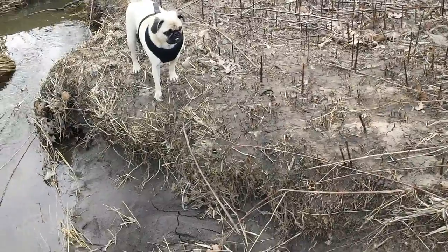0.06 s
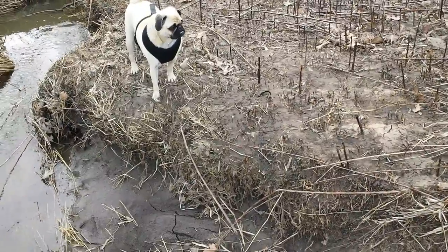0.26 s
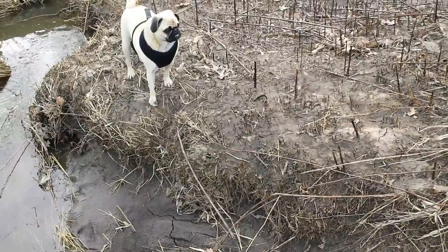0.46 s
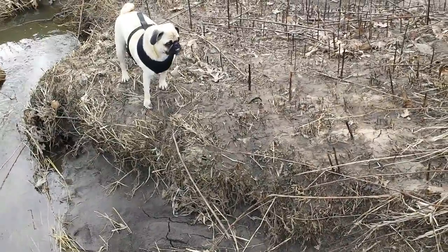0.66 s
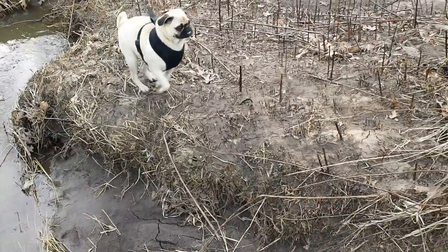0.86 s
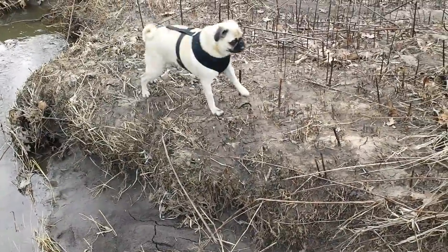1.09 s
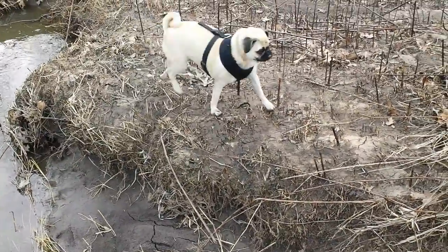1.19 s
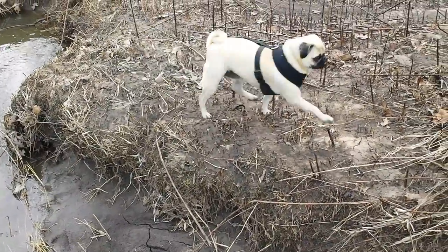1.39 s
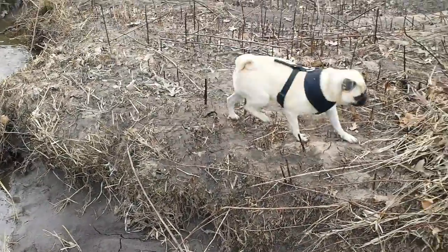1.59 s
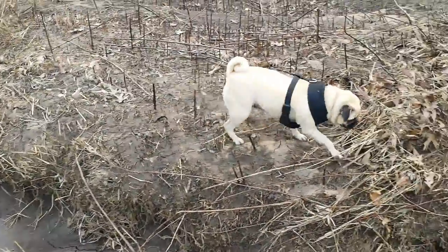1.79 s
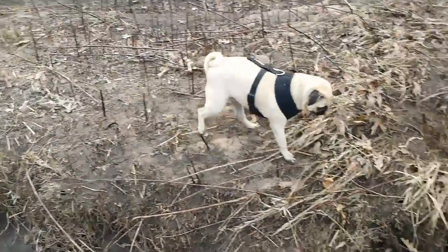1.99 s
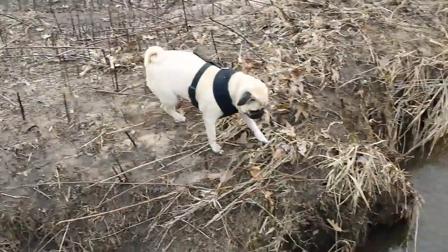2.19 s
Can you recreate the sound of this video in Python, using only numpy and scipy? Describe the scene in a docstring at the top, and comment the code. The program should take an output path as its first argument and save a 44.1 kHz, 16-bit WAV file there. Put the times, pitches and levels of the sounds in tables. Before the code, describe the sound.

A small dog's paws crunch and rustle through dry grass after wind buffets the microphone

```python
"""Creek bank of dry grass and reed stalks: a small dog trots by a hand-held two-port microphone.
Paws crush the grass (clumped cracks over hiss) and stalks snap (short noise bursts).
Wind rumbles gently on the left port and buffets the right one hard with bursting eddies (coloured noise).
The hand taps, knocks and ticks the casing (decaying modes); something wheezes once (narrow-band noise).
Far birds whistle and rasp (sines on pitch tracks) over the soft hiss of creek, reeds and open air."""
import sys
import numpy as np
from scipy import signal
from scipy.fft import rfft, irfft, next_fast_len
from scipy.io import wavfile
from scipy.ndimage import uniform_filter1d, map_coordinates

SR = 44100
rng = np.random.default_rng(int(sys.argv[2]) if len(sys.argv) > 2 else 0)


def dump_mix(stems):
    """Bounce the given channels to the path in sys.argv[1] as a 16-bit WAV at rate SR."""
    frames = np.atleast_2d(stems).T  # one column per channel
    limited = np.clip(frames, -1, 1)  # hard clip at full scale
    pcm = np.round(limited * 32767).astype(np.int16)
    wavfile.write(sys.argv[1], SR, pcm)


def natural_amplitude(level_db):
    """Convert a level in decibels to a linear amplitude factor, elementwise."""
    exponent = np.asarray(level_db, float) / 20
    return 10 ** exponent


N = 99225
T = np.arange(N) / SR


def unit(x):
    """Scales x to rms 1 over all its channels."""
    return x / np.sqrt(np.mean(x ** 2) + 1e-20)


def curve(rows):
    """Reads a (t/s, value) table at every sample."""
    return np.interp(T, *np.transpose(rows))


def wobble(knots_per_s):
    """Smooth random curve through normal knots."""
    knots = rng.standard_normal(int(N * knots_per_s / SR) + 4)
    return map_coordinates(knots, [T * knots_per_s])


def filtered(x, response):
    """Multiplies the spectrum of x by a response of frequency."""
    m = next_fast_len(N + 8192)
    return irfft(rfft(x, m) * response(np.fft.rfftfreq(m, 1 / SR)), m)[..., :N]


def colour(points):
    """Gain through (f/Hz, level/dB) points on a log frequency axis."""
    f, db = np.transpose(points)
    return lambda hz: natural_amplitude(np.interp(np.log(hz + 1), np.log(f), db))


def noise(points, channels=2):
    """Independent coloured noises, joint rms 1."""
    return unit(filtered(rng.standard_normal((channels, N)), colour(points)))


def add(track, s, x):
    """Mixes x into the track from time s."""
    part = track[..., round(s * SR):][..., :x.shape[-1]]
    part += x[..., :part.shape[-1]]


PATCH_DB = 2.6  # rms


def patchy(x):
    """Random gains over small patches of time and frequency make the sound blotchy."""
    z = signal.stft(x, nperseg=128)[2]
    field = rng.standard_normal(z.shape[1:])
    field = uniform_filter1d(field, size=5, axis=0)  # frequency
    field = uniform_filter1d(field, size=4, axis=1)  # time
    patches = z * natural_amplitude(PATCH_DB * unit(field))
    return unit(signal.istft(patches, nperseg=128)[1][:, :N])


# paws in the grass: t/s, level/dB
TREAD = [(1.862, -53), (1.875, -45.5), (1.935, -40), (1.985, -42.5), (2.03, -45), (2.095, -54.5),
         (2.12, -49), (2.19, -48), (2.25, -49.5)]
# stalks brushed lightly: middle t/s, half length/s, level/dB
BRUSHES = [(1.159, 0.033, -56), (1.286, 0.069, -52.5), (1.44, 0.016, -67), (1.75, 0.11, -59)]
# colour of crushed grass: f/Hz, level/dB
GRASS = [(200, -18.5), (700, -11), (2070, -4.5), (3600, -12), (5000, 1.5), (7500, -3), (13600, -12.5),
         (15500, -47)]
# snapping stalks: t/s, relative level/dB
SNAPS = [(0.819, -37), (1.2914, -30.5), (1.3183, -41), (1.618, -35.5), (1.721, -39.5), (1.732, -41),
         (1.7725, -38.5), (1.8844, -30), (1.8892, -25.5), (1.8932, -25.5), (1.9171, -29), (1.931, -25),
         (1.969, -30), (1.987, -29), (2.011, -36), (2.135, -42), (2.154, -41), (2.2204, -37)]
# colour of a snapping stalk: f/Hz, level/dB
STALK = [(1200, -18.5), (3500, -13.5), (5200, 1.5), (8500, -3), (13500, -18), (15500, -37)]
GRAINS_PER_S, GRAIN_SPREAD_DB, HISS_DB, LEFT_LAG_S = 3000, 3, 1, .00039
SNAP_DB, SNAP_RISE_S, SNAP_T60_S = -7, .0012, .015


def grass():
    """Crushed blades: dense tiny cracks in clumps over a hiss; stalks give way in short bursts."""
    sizes_db = GRAIN_SPREAD_DB * np.minimum(rng.exponential(size=N), 2)
    cracks = (rng.random(N) < GRAINS_PER_S / SR) * rng.standard_normal(N) * natural_amplitude(sizes_db)
    bed = unit(filtered(cracks, colour(GRASS))) + natural_amplitude(HISS_DB) * noise(GRASS)
    tread_db = np.interp(T, *np.transpose(TREAD), left=-120) + 1.14 * wobble(150)
    brush = np.zeros(N)
    for s, half_s, db in BRUSHES:
        brush += natural_amplitude(db) * np.cos(np.pi / 2 * np.clip((T - s) / half_s, -1, 1)) ** 2
    out = patchy(bed) * (natural_amplitude(tread_db) + brush)

    t = T[:SR // 10]
    shape = natural_amplitude(-60 * t / SNAP_T60_S) * (1 - np.exp(-t / SNAP_RISE_S))
    shape_rms = np.sqrt(np.mean(shape ** 2)) / shape.max()
    fibres = 0.7 * noise(STALK, channels=1) + 1.2 * noise(STALK)  # shared + per port
    for s, db in SNAPS:
        burst = shape * fibres[:, round(s * SR) - len(t):round(s * SR)]
        add(out, s, natural_amplitude(db + SNAP_DB) * unit(burst) * shape_rms)
    lag_s = np.array([[LEFT_LAG_S], [0]])
    return filtered(out, lambda hz: np.exp(-2j * np.pi * hz * lag_s))


# left port wind: t/s, level/dB
BREEZE = [(0, -49.5), (.8, -52), (1.25, -52), (1.6, -58.5)]
# right port wind under the eddies: t/s, level/dB
LULL = [(0, -54.5), (.6, -47.5), (1.3, -52.5), (1.5, -57), (1.9, -52.5)]
# colour of the rumble: f/Hz, level/dB
RUMBLE = [(12, -46), (25, -29), (50, 0), (110, 1), (170, -10), (300, -35), (600, -71), (1200, -120)]
# colour of the flutter: f/Hz, level/dB
FLUTTER = [(60, -43), (130, -6.5), (220, 1), (330, -10), (520, -23.5), (800, -35), (1600, -120)]
# eddies bursting on the right port: middle t/s, half length/s, level/dB, flutter re rumble/dB
EDDIES = [(0.241, 0.043, -36, -16.5), (0.304, 0.033, -31.5, -14.5), (.34, 0.031, -34.5, -6.5),
          (0.471, 0.022, -32.5, -13), (0.502, 0.011, -32, -28), (0.542, 0.029, -32.5, -25),
          (0.598, 0.045, -31.5, -22), (0.635, 0.015, -34, -13), (0.699, 0.046, -30, -14.5),
          (0.749, 0.024, -28, -5.5), (0.771, 0.019, -29, 3), (0.802, 0.027, -29, -8),
          (0.844, 0.029, -23.5, -7), (0.894, 0.032, -33, -16), (1.044, 0.043, -42, -13.5),
          (1.142, 0.031, -41, -19), (1.231, 0.027, -43, -25)]
CALM_FLUTTER_DB = -13  # re rumble


def wind():
    """Lumpy rumble on both ports; eddies burst on the right one, each a rumble with faster flutter."""
    left_db = curve(BREEZE) + 3 * wobble(7.23)
    right_db = curve(LULL) + 3 * wobble(20.95)
    out = natural_amplitude([left_db, right_db]) * (noise(RUMBLE) + natural_amplitude(CALM_FLUTTER_DB) * noise(FLUTTER))
    rumble, flutter = noise(RUMBLE, channels=1)[0], noise(FLUTTER, channels=1)[0]
    for s, half_s, db, flutter_db in EDDIES:
        near = slice(round((s - half_s) * SR), round((s + half_s) * SR))
        bell = np.cos(np.pi / 2 * (T[near] - s) / half_s) ** 2
        eddy = unit(bell * rumble[near]) + natural_amplitude(flutter_db) * unit(bell ** 2 * flutter[near])
        out[1, near] += natural_amplitude(db) * eddy
    return out


# soft finger taps: t/s, relative level/dB, port (0 left, 1 right)
TAPS = [(.033, -33, 0), (1.547, -33.5, 0), (2.039, -32.5, 1)]
# casing modes: f/Hz, relative level/dB, t60/s
CASING = [(368, -3.5, 0.032), (670, 4.5, 0.013), (1500, -9, 0.016)]
FAR_PORT_DB = -18
KNOCK_S, KNOCK_PUSH_S, KNOCK_DB, RATTLE_DB, RATTLE_T60_S = 1.8282, .00035, -21, -8, .035
TICK_S, TICK_DB, TICK_HZ, TICK_T60_S = 1.8674, -12.5, 5340, 0.001


def hand():
    """Soft taps ring the casing modes; the right port gets one knock with a rattle, then a sharp tick."""
    out, t = np.zeros((2, N)), T[:SR // 10]
    ring = sum(natural_amplitude(db - 60 * t / t60_s) * np.sin(2 * np.pi * hz * t) for hz, db, t60_s in CASING)
    for s, db, port in TAPS:
        far = np.arange(2)[:, None] != round(port)
        add(out, s, natural_amplitude(db - 9.0) * ring * natural_amplitude(FAR_PORT_DB * far))

    u = t / KNOCK_PUSH_S
    push = -np.e * u * np.exp(-u) + .2 * (u / 5) * np.exp(1 - u / 5)  # push, slower rebound
    rattle_noise = noise([(300, -16), (1500, 2.5), (6500, -2), (15000, -23.5)], channels=1)[0, :len(t)]
    rattle = natural_amplitude(RATTLE_DB - 60 * t / RATTLE_T60_S) * (1 - np.exp(-t / 0.00037)) * rattle_noise
    add(out[1], KNOCK_S, natural_amplitude(KNOCK_DB) * (push + rattle))

    tick = natural_amplitude(-60 * t / TICK_T60_S) * np.sin(2 * np.pi * TICK_HZ * t)
    add(out[1], TICK_S, natural_amplitude(TICK_DB) * tick)
    return out


# wheezy hiss: t/s, level/dB
SWISH = [(.67, -64), (.71, -52.5), (.8, -47), (.85, -50), (.9, -67)]
# its resonances: f/Hz, width/Hz, level/dB
SWISH_BANDS = [(4280, 890, -4), (6110, 420, 3.5), (5300, 10000, -10)]


def swish():
    """One wheezy swell: noise through two narrow resonances and a broad one."""
    def bands(f):
        power = sum(natural_amplitude(2 * db) / (1 + (2 * (f - hz) / width_hz) ** 2) ** 2
                    for hz, width_hz, db in SWISH_BANDS)
        return np.sqrt(power)
    level_db = np.interp(T, *np.transpose(SWISH), left=-120, right=-120)
    return natural_amplitude(level_db) * unit(filtered(rng.standard_normal((2, N)), bands))


FADE_S = .008


def whistle(pitch_hz, db):
    """Complex sine along a pitch track, with linear fades at both ends."""
    t = T[:len(pitch_hz)]
    fade = np.minimum(1, np.minimum(t, t[::-1]) / FADE_S)
    return natural_amplitude(db + 4.5) * fade * np.exp(2j * np.pi * np.cumsum(pitch_hz) / SR)


# whistles: t/s, length/s, first f/Hz, last f/Hz, relative level/dB
NOTES = [(.001, .08, 4500, 4330, -69), (.08, 0.069, 4310, 4180, -64.5), (.001, 0.13, 2750, 2917, -70.5),
         (0.136, 0.14, 4220, 4520, -65.5), (.782, 0.056, 5590, 5350, -59.5),
         (0.896, 0.09, 5400, 5490, -59.5), (0.916, .03, 5300, 5220, -56), (0.988, 0.041, 5530, 5480, -64),
         (0.979, 0.068, 4040, 4170, -68), (1.212, 0.031, 4150, 4090, -67), (1.243, 0.033, 4160, 4120, -54),
         (1.304, 0.065, 4050, 4050, -56.5), (1.335, .06, 5480, 5440, -66), (1.577, 0.03, 4750, 3040, -68),
         (1.637, 0.041, 4640, 4630, -64.5)]
# hoarse, fluttering calls: t/s, length/s, first f/Hz, last f/Hz, relative level/dB
RASPS = [(0.203, 0.017, 1750, 1980, -57.5), (0.834, 0.071, 4150, 4040, -61.5),
         (0.924, .075, 2700, 2450, -61), (1.065, 0.074, 4560, 4770, -58.5), (1.145, 0.03, 2690, 2510, -63),
         (1.142, 0.045, 5600, 5920, -58), (1.187, 0.028, 5600, 3030, -58.5),
         (1.262, 0.024, 3500, 3300, -60), (1.43, .022, 5100, 3310, -61.5), (1.528, 0.035, 4250, 4900, -63)]
# chirps that bend over: t/s, length/s, top f/Hz, relative level/dB
ARCHES = [(0.083, 0.052, 7350, -62.5), (0.165, 0.041, 7030, -62.5)]
ARCH_TOP, ARCH_DEPTH = .7, .25  # position in the chirp 0..1, curvature
RASP_RAD, RASP_KNOTS_PER_S, RASP_DB = 1.1, 320, 2.5  # level flutters at half this knot rate
WAVER_DB, WAVER_KNOTS_PER_S = 2, 45.07
WARBLE_RAD, WARBLE_KNOTS_PER_S = .9, 170
TREES_T60_S, TREES_DB = .12, -9


def birds():
    """Far whistles waver in level and phase on their way to each port and linger among the trees."""
    song = np.zeros(N, complex)
    for s, length_s, first_hz, last_hz, db in NOTES:
        add(song, s, whistle(np.linspace(first_hz, last_hz, round(length_s * SR)), db))
    rasp_gain = natural_amplitude(RASP_DB * wobble(RASP_KNOTS_PER_S / 2))
    rasp = rasp_gain * np.exp(1j * RASP_RAD * wobble(RASP_KNOTS_PER_S))
    for s, length_s, first_hz, last_hz, db in RASPS:
        call = whistle(np.linspace(first_hz, last_hz, round(length_s * SR)), db)
        add(song, s, call * rasp[round(s * SR):][:len(call)])
    for s, length_s, top_hz, db in ARCHES:
        u = np.linspace(0, 1, round(length_s * SR))
        add(song, s, whistle(top_hz * (1 - ARCH_DEPTH * (u - ARCH_TOP) ** 2), db))

    heard = np.zeros((2, N))
    for port in range(2):
        waver = natural_amplitude(WAVER_DB * wobble(WAVER_KNOTS_PER_S))
        warble = np.exp(1j * WARBLE_RAD * wobble(WARBLE_KNOTS_PER_S))
        heard[port] = (song * waver * warble).real
    t = T[:SR // 3]
    tail = rng.standard_normal((2, len(t))) * natural_amplitude(-60 * t / TREES_T60_S)
    tail = tail / np.linalg.norm(tail[0])
    return heard + natural_amplitude(TREES_DB) * signal.fftconvolve(heard, tail, axes=1)[:, :N]


# colour of the hiss: f/Hz, level/dB
AIR = [(90, -48), (200, -15.5), (900, -15), (1500, -21.5), (5300, -17), (13800, -25.5), (15500, -54)]
# its course: t/s, level/dB
AIR_LEVEL = [(0, -58), (.3, -56), (.6, -58), (1, -57), (1.8, -60.5), (2.25, -54.5)]


def air():
    """Far creek, reeds and open air: soft coloured noise of slowly wandering level."""
    return natural_amplitude(curve(AIR_LEVEL) + wobble(9.9)) * noise(AIR)


# each port's duct: f/Hz, level/dB
LEFT_PORT = [(3500, 1), (5000, -2), (7200, 4), (8500, -7.5), (15000, 0.5)]
RIGHT_PORT = [(4400, 1.5), (5200, -1), (6000, -3.5), (7800, -2), (8600, 2), (15000, 2)]


def scene():
    """Air, grass and swish pass through the port ducts; wind, hand and birds are added directly."""
    def ducts(hz):
        return np.array([colour(LEFT_PORT)(hz), colour(RIGHT_PORT)(hz)])
    return wind() + hand() + birds() + filtered(air() + grass() + swish(), ducts)


def band_limit(x):
    """A steep low-pass at the top of the band."""
    return signal.sosfilt(signal.butter(12, 15870, fs=SR, output="sos"), x)


def record(dry):
    """Takes the two ports as the finished stereo mix."""
    return band_limit(dry)


dry = scene()
out = record(dry)
dump_mix(out)
```